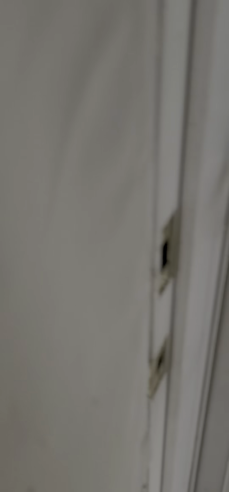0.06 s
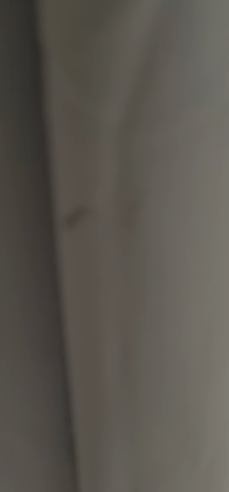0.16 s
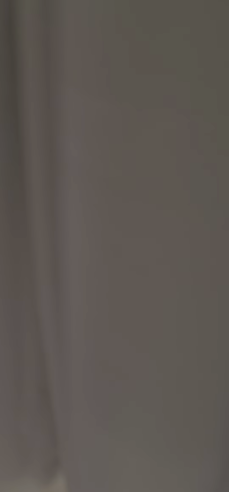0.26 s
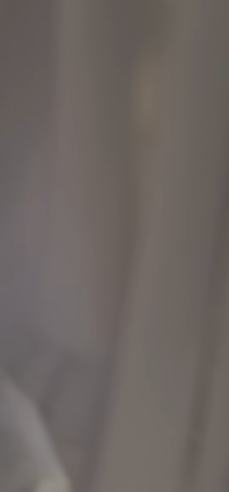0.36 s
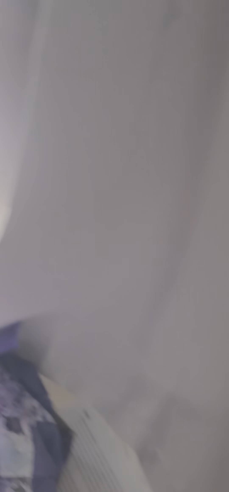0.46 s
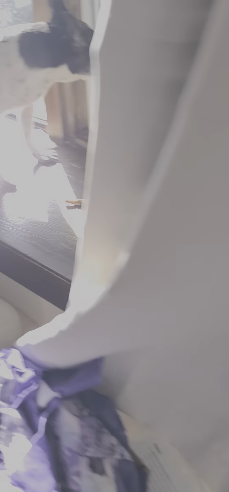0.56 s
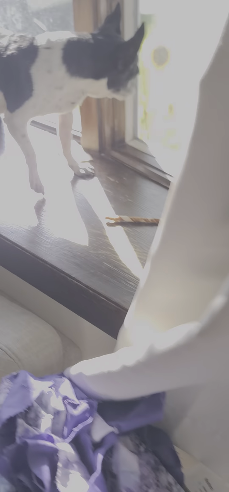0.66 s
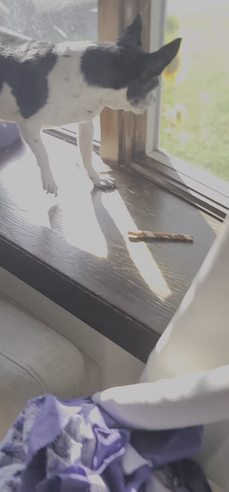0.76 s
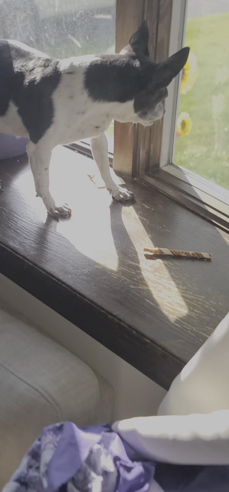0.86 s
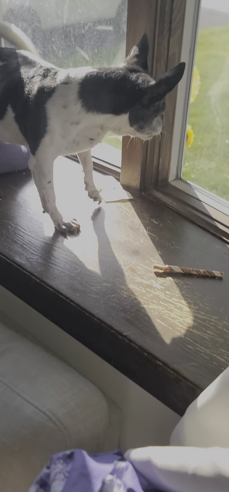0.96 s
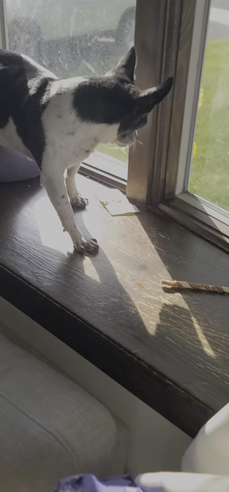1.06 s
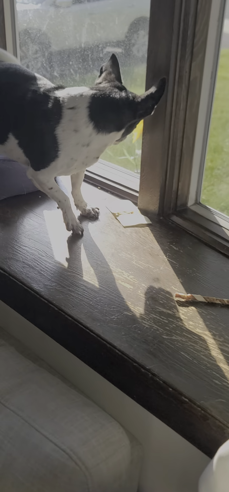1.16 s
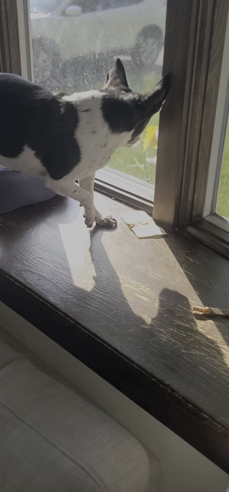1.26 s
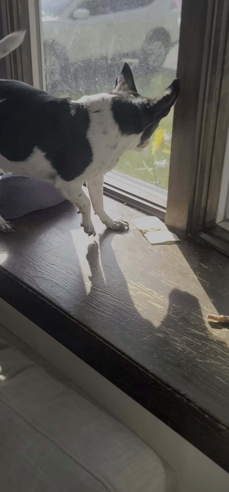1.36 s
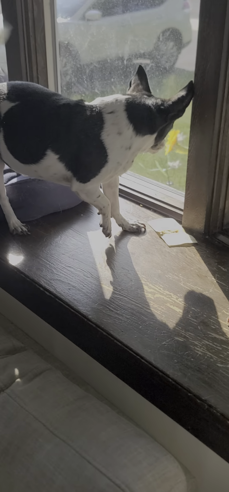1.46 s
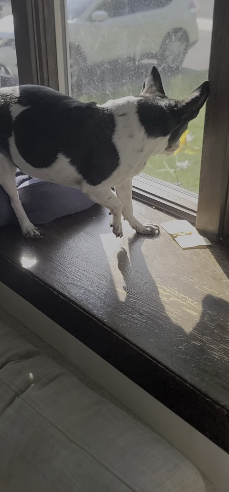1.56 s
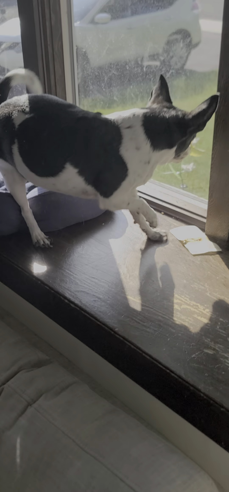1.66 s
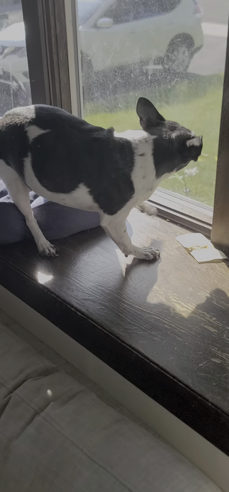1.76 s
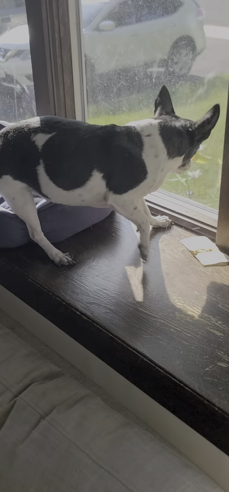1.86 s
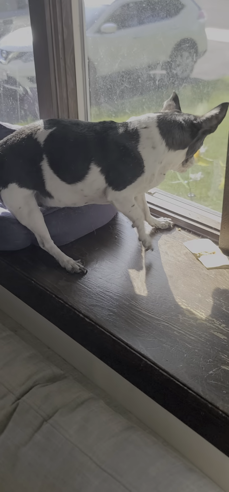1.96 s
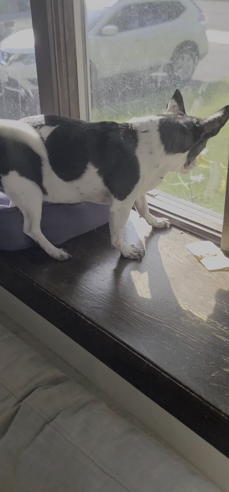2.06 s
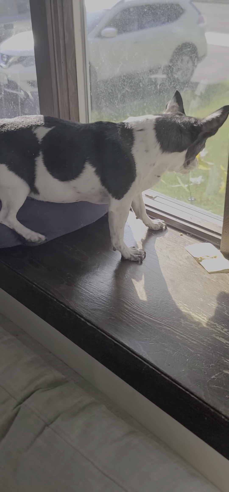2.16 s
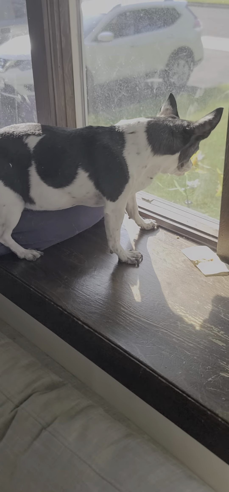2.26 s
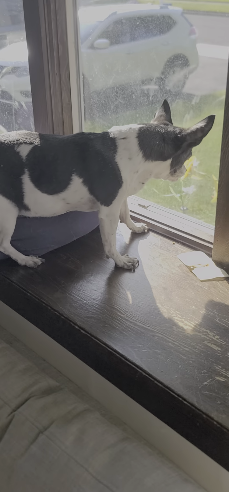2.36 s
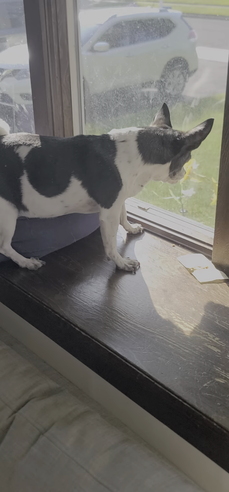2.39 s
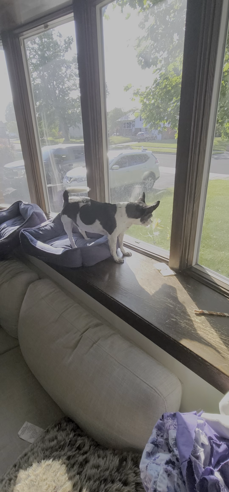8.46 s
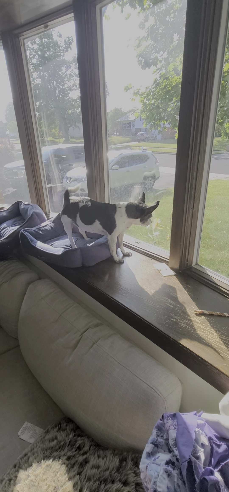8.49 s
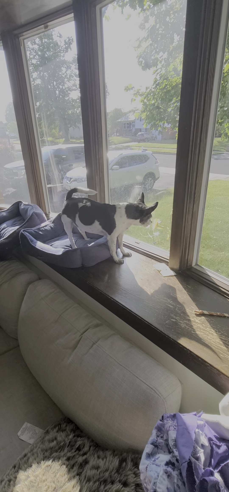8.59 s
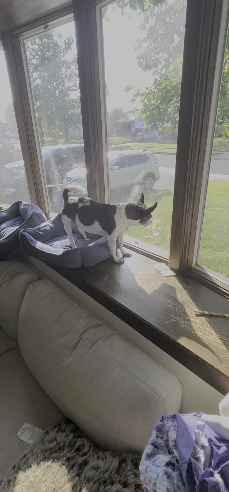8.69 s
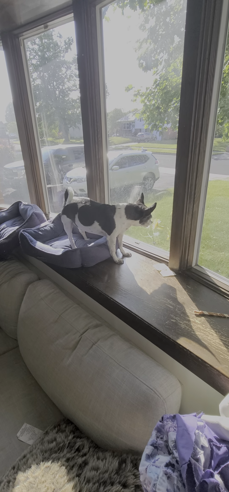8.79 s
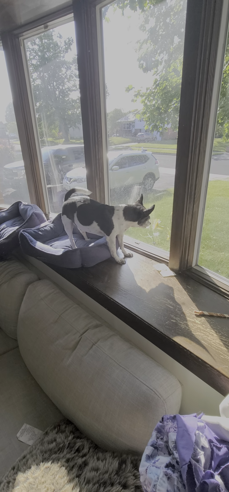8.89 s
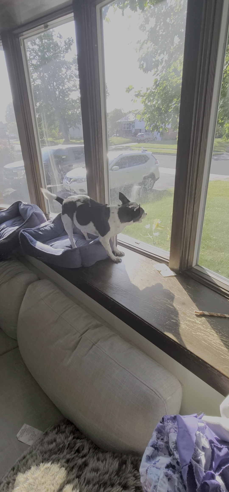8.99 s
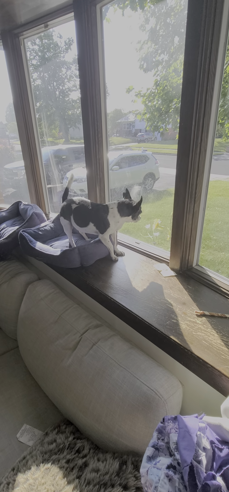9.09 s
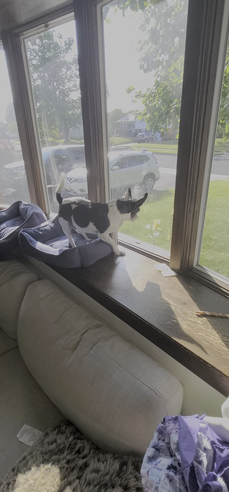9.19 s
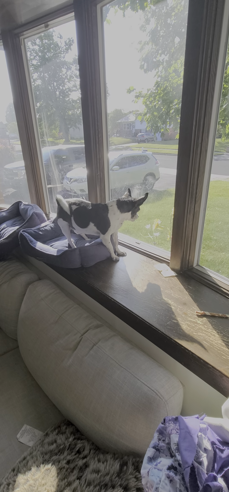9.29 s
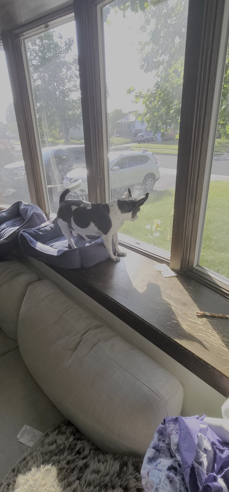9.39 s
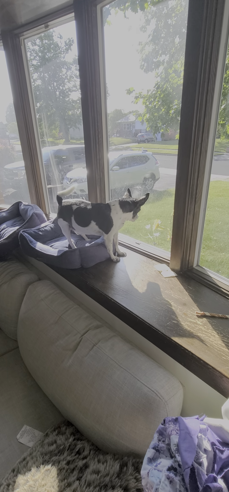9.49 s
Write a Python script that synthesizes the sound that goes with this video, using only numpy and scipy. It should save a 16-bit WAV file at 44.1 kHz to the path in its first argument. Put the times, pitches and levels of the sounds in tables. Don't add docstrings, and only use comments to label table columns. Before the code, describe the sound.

A small dog by a living-room window growls in fluttering low rasps and snaps eight sharp single barks, with claw ticks and dull seat knocks between.

```python
import sys
import numpy as np
from scipy import signal
from scipy.fft import rfft, irfft, next_fast_len
from scipy.io import wavfile
from scipy.ndimage import uniform_filter1d

SR = 44100
rng = np.random.default_rng(int(sys.argv[2]) if len(sys.argv) > 2 else 0)


def magnitude_from_level(level_db):
    exponent = np.asarray(level_db, float) / 20
    return 10 ** exponent


def master(y):
    cut = np.clip(np.atleast_2d(y).T, -1, 1)
    pcm = np.round(cut * 32767)
    wavfile.write(sys.argv[1], SR, pcm.astype(np.int16))


N = 420713

# (frequency [Hz], density [dB per Hz])
RUMBLE_LEVEL = [(0.0, -49.5), (4.75, -56.5), (5.21, -43), (5.5, -54), (8.5, -54), (9.54, -59.5)]
RUMBLE_SPECTRUM = [(12, -59.5), (20, -37), (64, 3.5), (90, -6.5), (151, -10.5), (167, -22.5), (244, -17),
                   (536, -27.5), (769, -25), (1200, -28.5), (1560, -68.5), (2640, -120)]
# (frequency [Hz], density [dB per Hz])
RUSTLE_LEVEL = [(0.0, -68.5), (0.14, -78), (0.58, -61.5), (1.7, -75.5), (1.83, -65.5), (2.1, -68),
                (2.2, -70.5), (3.0, -77), (3.43, -83), (3.8, -66), (4.08, -70.5), (4.14, -59.5),
                (4.24, -71), (4.81, -71.5), (5.26, -67), (5.47, -75), (8.1, -74.5), (8.4, -78.5),
                (9.33, -73.5), (9.54, -80.5)]
RUSTLE_SPECTRUM = [(530, -45), (900, -16.5), (956, -13), (1200, -4), (2500, -8), (5410, -17), (6250, -8),
                   (7230, -19.5), (12600, -20.5), (16000, -37)]
# (time [s], peak [dB], pitch [Hz])
THUDS = [
    (4.418, -41.5, 60),
    (4.755, -30.5, 65.4),
    (5.068, -27, 61.8),
    (8.223, -31, 59.5),
]
# (time [s], peak [dB], ring [Hz], treble [dB])
TICKS = [(0.029, -37, 3430, -23), (0.0365, -27, 3800, -18), (0.05, -43, 5900, -27.5), (.262, -54, 6500, -3),
         (.879, -50, 3970, -20.5), (0.994, -43.5, 2640, -12.5), (1.273, -42.5, 2940, -22),
         (3.948, -44, 1900, -18.5), (4.263, -47.5, 6270, -9), (4.493, -40, 2270, -9.5),
         (4.749, -49, 2300, -13), (1.09, -34, 3400, -12.5), (5.052, -45.5, 2100, -15),
         (5.457, -49.5, 1920, -9), (5.948, -47, 3180, -8), (0.3224, -24, 3040, -12),
         (0.4005, -36.5, 3320, -28), (0.807, -44, 2460, -37), (1.016, -38.5, 3200, -4.5),
         (1.0315, -18.5, 3460, 1.5), (1.05, -31.5, 6400, -4), (1.07, -39, 2600, -13),
         (1.115, -38.5, 6350, -11.5), (1.171, -35, 3340, -15.5), (1.1458, -29, 2450, -10),
         (1.1896, -35.5, 2000, -17), (1.4207, -42, 3000, -0.5), (1.705, -20, 2885, -27.5),
         (1.8258, -26, 6500, -13.5), (1.887, -32, 2470, -5.5), (1.9999, -29, 3100, -14),
         (2.0691, -45, 3200, -8), (2.2238, -29.5, 3220, -15.5), (3.9711, -42.5, 1970, 0),
         (4.1195, -47, 2850, -9.5), (2.418, -42.5, 2050, -32), (2.548, -36, 2870, -16.5),
         (4.4722, -29.5, 2210, -9.5), (4.9061, -25, 2740, -24.5), (5.0767, -33.5, 2250, -9.5),
         (5.3777, -32.5, 2040, -7), (5.7964, -32.5, 5890, -9.5), (6.0702, -37.5, 2280, -21),
         (6.6421, -43, 2780, -12.5), (6.9967, -40, 2330, -9), (7.975, -45, 2200, -9.5),
         (8.4996, -44, 2340, -23), (9.2892, -37.5, 2230, -19.5)]
# (frequency [Hz], density [dB per Hz])
TICK_SPECTRUM = [(650, -46), (1150, -22), (1650, -9), (2950, -8), (3600, -9), (4560, -12), (5710, -12),
                 (7500, -17), (9750, -21), (16500, -120)]
# (time [s], peak [dB])
LAST_KNOCKS = [(.735, -24.5), (1.975, -21), (2.883, -28), (4.027, -26), (5.403, -26), (6.691, -30),
               (7.989, -25.5), (9.239, -26.5)]
# (frequency [Hz], level [dB])
ROOM_T60 = [(150, 0.99), (400, 0.4), (800, 0.51), (1500, 0.48), (3000, 0.33), (8000, 0.34)]
ECHO_LEVEL = [(150, -14), (400, -0.5), (800, -8), (1200, -9.5), (1600, -4.5), (3000, -5), (8000, -5.5)]
# (frequency [Hz], width [Hz], level [dB])
WINDOW_PANES = [(368, 12, -15), (757, 9, -10), (808, 5.5, -9), (1150, 9, -7), (1245, 6, -8), (1490, 9, -12)]
# (frequency [Hz], left over right [dB])
LEFT_LEAD = [(170, .1), (260, .5), (430, .5), (600, -.1), (775, .1), (950, 1.8), (1120, 4.7), (1640, 4.1),
             (2150, 6.2), (2600, 6.6), (3600, 5), (5000, 3.9), (7900, 4.8), (11400, 3.3), (16000, 4)]
LEFT_TILT = [(60, -1.2), (400, 0), (760, -4.2), (1000, -.5), (1400, -1.5), (1700, 3.5), (2300, 3.5),
             (3400, -2.5), (5000, 3), (15000, 4)]

# (start [s], end [s], frequency [Hz], width [Hz], level [dB])
NOSE = [(1.33, 1.66, 5850, 260, -62), (1.4, 1.66, 6700, 300, -68), (3.3, 3.7, 7600, 500, -69),
        (3.42, 3.7, 8900, 1200, -68), (4.48, 5.14, 8350, 600, -62), (4.52, 5.14, 9150, 500, -63),
        (4.5, 5.1, 14500, 3000, -72), (7.3, 7.68, 8000, 900, -73), (7.4, 7.68, 12700, 500, -76),
        (7.5, 7.68, 9500, 600, -75), (8.6, 8.92, 8300, 1100, -70)]
# (time [s], effort [dB], fundamental against it [dB], pitch [Hz], throat [Hz])
DRONE = [(1.14, -49, 2, 233.7, 510), (1.169, -35.5, 3, 245, 487), (1.251, -38, -7, 251.8, 557),
         (1.299, -39.5, -1.5, 252.4, 689), (1.361, -47, 12, 249.6, 667), (1.42, -40.5, -4, 201.8, 506),
         (1.519, -41, -5.5, 185.1, 445), (1.617, -46.5, -7, 195.6, 519.5), (1.681, -29, 4, 252.6, 576)]
# (time [s], peak [dB], fundamental against it [dB])
FLAPS = [(0.229, -35, -9.5), (0.245, -26, -1), (0.281, -24.5, -1), (0.324, -19.5, -9.5),
         (0.356, -26, -10), (0.396, -30.5, 1), (2.46, -25.5, -1), (2.493, -25.5, -14),
         (2.531, -23, -4), (3.304, -34.5, -3), (3.319, -30.5, -0.5), (3.362, -28.5, -12.5),
         (3.397, -27.5, -2), (3.441, -22.5, -5.5), (3.477, -19.5, -7.5), (3.518, -27, -4),
         (3.56, -14.5, -8.5), (3.6, -16, -10), (3.64, -31, -1), (4.354, -27, 0), (4.376, -20, 0.5),
         (4.414, -17.5, -5.5), (4.458, -20.5, -6.5), (4.497, -20, -1.5), (4.529, -17, -21),
         (4.58, -31, -5), (4.623, -24, -0.5), (4.656, -29.5, -21), (4.703, -18.5, -8.5),
         (4.75, -22.5, -14.5), (4.802, -26, -17), (4.836, -19.5, -11.5), (4.887, -24, -13),
         (4.924, -20.5, -5.5), (4.968, -27, 3), (5.02, -22, 0.5), (5.057, -15.5, -18.5),
         (5.083, -19.5, -16), (5.107, -18, 0),
         (5.897, -35, 1), (5.928, -28, -7), (5.972, -31, 7), (6.015, -28, -1.5), (6.061, -23.5, -17),
              (6.088, -37.5, 9), (6.137, -20.5, -2.5), (6.184, -21.5, -6), (6.223, -22, -6),
              (6.273, -22.5, -18), (6.307, -18, -6), (7.14, -38.5, -2.5), (7.158, -29.5, -0.5),
              (7.189, -28.5, -0.5), (7.236, -23, -6), (7.278, -28, -7.5), (7.322, -25, -4),
              (7.357, -27.5, 0.5), (7.407, -31.5, -23), (7.449, -34.5, -3.5), (7.489, -18, -11),
              (7.536, -19.5, -12), (7.576, -17.5, -6.5), (7.619, -18, -5.5), (8.449, -39.5, 4.5),
              (8.493, -23, -6.5), (8.537, -24, -15), (8.57, -22, -17), (8.62, -25.5, 3), (8.662, -24, -11),
              (8.711, -27.5, -25), (8.754, -28.5, -1.5), (8.792, -25.5, -4), (8.823, -16.5, -10.5),
              (8.878, -20, -14)]
# (time [s], effort between flutters [dB], pitch [Hz], throat resonance [Hz])
GROWLS = [
    [(0.21, -66, 230.9, 439), (0.288, -64, 233.2, 396.6), (0.36, -41, 205, 430), (0.44, -9, 204.3, 567)],
    [(2.44, -71.5, 210.4, 645), (2.482, -78, 223.8, 599), (2.57, -59, 268.6, 620)],
    [(3.3, -58, 202, 680), (3.36, -57, 208.9, 694), (3.41, -48, 210.4, 648), (3.582, -37, 227.3, 643),
     (3.69, -28, 245, 690)],
    [(4.33, -52, 231.5, 617), (4.43, -38.5, 240.3, 700), (4.55, -35, 245.6, 665), (5.12, -31, 251.5, 651)],
    [(5.87, -48.5, 207.6, 607), (6.0, -39, 212.1, 678), (6.2, -40, 220.4, 574), (6.34, -32.5, 221.5, 626)],
    [(7.13, -57.5, 219.4, 620), (7.23, -53, 212.5, 648), (7.442, -37, 209.2, 608), (7.68, -41, 247.3, 620)],
    [(8.43, -68, 215, 610), (8.49, -63.5, 211.8, 640), (8.718, -44, 204, 594), (8.92, -34.5, 261.6, 660)],
]
# (share of throat frequency [ratio], width [Hz], level [dB])
GROWL_THROAT = [(0.8, 120, 2), (1.048, 130, 6)]
# (from [Hz], to [Hz], width [Hz], level [dB], closing time [s])
LIPS = (1250, 1000, 330, -6, 0.16)
OPEN_LIPS = [-16, -22, -10, -4, -8, -4, -9.5]
NASAL_RING = [-46, -44, -47, -49, -48, -39, -41]

# (loud from [s], swell [s], voice holds [s], top pitch [Hz], pitch climb [s])
BARKS = [
    (0.463, .045, 0.076, 384.8, .022),
    (1.714, .045, 0.053, 391, .02),
    (2.596, .05, 0.061, 387.8, .016),
    (3.698, 0.024, 0.075, 390.2, .02),
    (5.136, .035, 0.089, 395, .04),
    (6.362, .029, .082, 380.2, .018),
    (7.685, .03, 0.075, 400.1, .042),
    (8.94, .055, .09, 385.1, .022),
]
# (jaw ring [dB], bite [dB], tongue [dB], broken ending [dB], lingering fundamental [dB])
JAWS = [(-4, 2, 3, -3, -31), (0, 4, -5, -7.5, -17), (5, 5.5, -4.5, -6.5, -13),
        (8, -3.5, -8.5, -11.5, -13.5), (4, 3.5, -6, -6, -23), (5, -8, -7.5, -10, -19.5),
        (6.5, 1, -2, -6.5, -20.5), (6, 4, -7, -13.5, -13)]
# (level [dB], top above 8 kHz [dB], effort [dB], fundamental [dB])
TEETH = [(-1.5, -8, -0.34, 1), (0.5, -1.5, 0.05, 5.5), (1.5, 2, -1.2, 0), (1.5, 3.5, -1, -1.5),
         (-1.5, 2.5, -0.9, -1.5), (-1.5, 3.5, 0.84, -1), (-2, 1.5, 0.64, -4), (-0.5, 2.5, -0.64, -1)]
# (resonance [Hz], climb [Hz/s], catch delay [s], catch [dB], throat shrinks to [ratio])
TONGUES = [(2290, 5000, 0.02, 4, 0.8), (2600, 15000, 0.0068, 2, .85), (2400, 13000, .015, -1.5, .92),
           (2450, 8900, .015, 0, .92), (2300, 9400, 0.013, 5, 0.87), (2480, 11000, 0.012, -6, .9),
           (2450, 13000, 0.014, 0.5, 0.77), (2450, 14000, 0.021, -8, 0.61)]
# (frequency [Hz], width [Hz], level [dB])
BARK_THROAT = [(330, 700, -13.5), (774.6, 280, -1)]
BARK_MOUTH = [(665, 550, -18.5), (2040, 300, -24), (2310, 110, -28.5)]
# (frequency [Hz], width [Hz])
JAW_RING = (1167, 600)
# (frequency [Hz], width [Hz], level [dB])
BITE = (1520, 310, -20.5)
# (up to [Hz], width [Hz], level [dB])
TONGUE_SWEEP = (3500, 200, -26)
# (frequency [Hz], density [dB per Hz])
BREATH = [(1760, -44), (2900, -25.5), (3650, -43.5), (4250, -25), (4850, -18.5), (5700, -4.5), (6500, -8.5),
          (9600, -13.5), (11400, -24), (14000, -17), (16000, -29)]
# (from [Hz], to [Hz], width [Hz], level [dB])
WHISTLE = (4201, 4498.5, 300.5, -17.5)


def read(points, hz):
    f, value = np.transpose(points)
    return np.interp(np.log(hz + 1), np.log(f + 1), value)


def evened(x):
    return x / np.sqrt(np.mean(x ** 2) + 1e-20)


def add(mix, s, sound):
    part = mix[..., round(s * SR):][..., :sound.shape[-1]]
    part += sound[..., :part.shape[-1]]


def resonate(x, hz, width):
    turn = np.exp(2j * np.pi * np.cumsum(hz * np.ones(x.shape[-1])) / SR)
    r = np.exp(-np.pi * width / SR)
    return 2 * (turn * signal.lfilter([(1 - r) ** 2], [1, -2 * r, r * r], x / turn)).real


def coloured(x, points):
    size = next_fast_len(x.shape[-1])
    gain = magnitude_from_level(read(points, np.fft.rfftfreq(size, 1 / SR)))
    return evened(irfft(rfft(x, size) * gain, size)[..., :x.shape[-1]])


def wobble(n, ms):
    span = max(int(ms * SR / 1000), 2)
    return evened(uniform_filter1d(uniform_filter1d(rng.standard_normal(n), span), span))


def patchy(x, patch_db, bins=5, frames=6):
    z = signal.stft(x, nperseg=256)[2]
    patches = uniform_filter1d(rng.standard_normal(z.shape[-2:]), size=bins, axis=0)
    patches = uniform_filter1d(patches, size=frames, axis=1)
    z = z * magnitude_from_level(patch_db * evened(patches))
    return evened(signal.istft(z, nperseg=256)[1][..., :x.shape[-1]])


def background():
    t = np.arange(N) / SR
    a, b = rng.standard_normal((2, 3, N))
    rumble = coloured(a[0] + .18 * a[1:], RUMBLE_SPECTRUM)
    rumble *= magnitude_from_level(np.interp(t, *np.transpose(RUMBLE_LEVEL)) - 3.0 + 0.75 * wobble(N, 40))
    rustle = patchy(coloured(b[0] + b[1:], RUSTLE_SPECTRUM), patch_db=3.5, bins=9, frames=30)
    rustle *= magnitude_from_level(np.interp(t, *np.transpose(RUSTLE_LEVEL)) + 4.5 + 1.5 * wobble(N, 12))
    return rumble + rustle


def room(x):
    taps = np.zeros((3, SR))
    at = np.arange(300, SR - 20, 20) + rng.integers(0, 20, (3, (SR - 301) // 20))
    np.put_along_axis(taps, at, rng.choice([-1., 1.], at.shape), 1)
    hz, t, z = signal.stft(taps[0] + 1.8 * taps[1:], SR, nperseg=256)
    t60 = read(ROOM_T60, hz)[:, None]
    z = z * magnitude_from_level(read(ECHO_LEVEL, hz)[:, None] - 60 * t / t60)
    z /= np.sqrt(t60 * SR / 100)
    echoes = signal.istft(z, SR, nperseg=256)[1]
    return signal.fftconvolve(x[None], echoes, axes=1)[:, :N]


def window_bay(x):
    return sum(magnitude_from_level(db) * resonate(x, hz, width) for hz, width, db in WINDOW_PANES)


def thuds():
    out, t = np.zeros(N), np.arange(14000) / SR
    swell = (1 - np.exp(-(t / .045) ** 2)) * np.exp(-t / .05)
    for s, db, hz in THUDS:
        add(out, s - .01, magnitude_from_level(db + 9.0) * np.sin(2 * np.pi * hz * t) * swell)
    return out


def ticks():
    out, t = np.zeros((2, N)), np.arange(12000) / SR
    scratch_t60 = 0.43
    for s, db, hz, treble_db in TICKS:
        a, b = rng.standard_normal((2, 3, len(t)))
        noise = patchy(coloured(a[0] + 2.0 * a[1:], TICK_SPECTRUM), patch_db=5.0)
        treble = evened(resonate(resonate(b[0] + 1.8 * b[1:], 11000, 12000), 11000, 12000))
        noise += magnitude_from_level(treble_db) * treble * (0.52 + 0.6 * np.exp(-t / 0.026))
        noise += 0.31 * evened(resonate(b[0], 500, 700))
        soft = np.maximum(.0022 * magnitude_from_level(-.35 * (db + 25)), .003)
        crack = noise * (np.exp(-t / (3.0 * soft)) + 0.15 * magnitude_from_level(-60 * t / scratch_t60))
        ring = .6 * np.sin(2 * np.pi * hz * t) * np.exp(-t / .004)
        side_gain = magnitude_from_level(db - 5.0 + np.array([[-.6], [.6]]))
        add(out, s - soft, side_gain * (crack + ring) * (1 - np.exp(-(t / soft) ** 2)))
    return out


def knocks():
    out, t = np.zeros(N), np.arange(4000) / SR
    shape = (1 - np.exp(-t / 0.00071)) * np.exp(-t / 0.023)
    for (loud, _, holds, *_), (last, last_db) in zip(BARKS, LAST_KNOCKS):
        first = loud + holds + .068
        times = (first, (first + last) / 2, last)
        for s, db, hz in zip(times, (-26.5, -33, last_db), (205, 143, 134)):
            low = evened(resonate(rng.standard_normal(len(t)), hz * rng.uniform(.75, 1.4), 110))
            slap = evened(resonate(rng.standard_normal(len(t)), 750, 900))
            add(out, s - .005, magnitude_from_level(db - 7) * (low + 0.5 * slap) * shape)
    return out


def folds(hz, rough, jitter):
    rough = np.clip(rough, 0, 1)
    turns = np.cumsum(hz * (1 + jitter * rough * wobble(len(hz), 3))) / SR
    pulses = evened(sum(np.cos(2 * np.pi * k * turns) for k in range(1, 9)))
    noise = resonate(rng.standard_normal(len(hz)), 770, 1900)
    puffs = evened((0.6 + np.exp(-(turns % 1) / 0.51)) * noise)
    return (1 - rough) * pulses + rough * puffs, turns


def nose_hiss(start, end, hz, width, db, flaps):
    n = round((end - start) * SR)
    glide = hz * np.linspace(.975, 1.025, n) + 70 * wobble(n, 40)
    air = evened(resonate(rng.standard_normal(n), glide, .7 * width))
    air *= magnitude_from_level(db - 3.5 + 3.5 * wobble(n, 8))
    puffs = flaps[round(start * SR):][:n]
    puffs = puffs / (uniform_filter1d(puffs, size=2600) + 1e-3)
    return air * (0.26 + .5 * puffs) * np.linspace(.6, 1.2, n) * signal.windows.tukey(n, .2)


def drone():
    s, *columns = np.transpose(DRONE)
    t = np.arange(s[0], s[-1], 1 / SR)
    effort_db, low_db, hz, throat_hz = (np.interp(t, s, c) for c in columns)
    rough = np.clip(.36 + .007 * (250 - hz), .35, .75)
    drive, turns = folds(hz, rough, jitter=0.11)
    drive *= 1 + 0.4 * np.cos(np.pi * turns)
    throat = evened(resonate(resonate(drive, throat_hz, 330), throat_hz - 60, 890))
    lips = magnitude_from_level(-1.5 - 150 * abs(t - s[0] - .05)) * evened(resonate(drive, 770, 260))
    lips += magnitude_from_level(-8.5 - 90 * abs(t - s[0] - .07)) * evened(resonate(drive, 1160, 260))
    chest = magnitude_from_level(low_db) * np.sqrt(2) * np.cos(2 * np.pi * turns)
    chest *= magnitude_from_level(-1.5 + 1.8 * wobble(len(t), 12))
    level = magnitude_from_level(effort_db + 5.0 * np.tanh(wobble(len(t), 1.6)))
    return s[0], level * (throat + lips + chest) * signal.windows.tukey(len(t), .05)


def flutter():
    t, gate = np.arange(2200) / SR, np.zeros((2, N))
    flap = (1 - np.exp(-(t / .008) ** 2)) * np.exp(-(t / .016) ** 2)
    for s, db, low_db in FLAPS:
        add(gate, s - .003, magnitude_from_level([[db - 5.5], [db - 5.5 + low_db]]) * flap)
    return gate


def growl(rows, open_db, nasal_db, gate):
    s, *columns = np.transpose(rows)
    t = np.arange(s[0], s[-1], 1 / SR)
    effort_db, hz, throat_hz = (np.interp(t, s, c) for c in columns)
    high, low = gate[:, round(s[0] * SR):][:, :len(t)]
    ride = high / (uniform_filter1d(high, size=2600) + magnitude_from_level(effort_db))
    hz = hz * (1 + 0.038 * (ride - .8))
    throat_hz = throat_hz * (1 + 0.073 * (ride - .8))
    rough = np.clip(.45 - (effort_db + 36) / 35, .4, .85)
    drive, _ = folds(hz, rough, jitter=.2)
    throat = sum(magnitude_from_level(db) * resonate(drive, share * throat_hz, w) for share, w, db in GROWL_THROAT)
    from_hz, to_hz, width, lips_db, closing = LIPS
    gap = np.exp(-(t - t[0]) / closing)
    lips = resonate(resonate(drive, to_hz + (from_hz - to_hz) * gap, width), 1400, 900)
    nasal = evened(resonate(drive, 2450 + 330 * gap ** 2, 200))
    throat = evened(resonate(throat, throat_hz, 900))
    throat += magnitude_from_level(lips_db + open_db) * (.14 + gap) * evened(lips)
    throat += magnitude_from_level(nasal_db) * (1 + 3 * gap ** 3) * nasal
    throat /= np.sqrt(uniform_filter1d(throat ** 2, size=500) + 0.37)
    chest = evened(resonate(drive, hz, 110))
    steady = magnitude_from_level(effort_db - 9 + 3.5 * wobble(len(t), 5))
    voice = throat * (high + steady) + chest * (low + 0.56 * steady)
    return s[0], voice * signal.windows.tukey(len(t), .08)


def bark_throat(drive, opening, closing, low_db):
    throat = 0
    for k, (hz, width, db) in enumerate(BARK_THROAT):
        ring = resonate(drive, hz * (0.79 + 0.2 * opening) * closing ** k, width)
        throat = throat + (-1) ** k * magnitude_from_level(db + low_db * (1.5 - k)) * ring
    return throat / np.sqrt(uniform_filter1d(throat ** 2, size=900) + 1e-9)


def bark_mouth(hoarse, since, swell, bite_db, tongue_db, tongue_hz, tongue_climb):
    rising = 0.831 + rng.uniform(0.12, 0.13) * np.clip((since + swell) / 0.13, 0, 1)
    mouth = sum(magnitude_from_level(db) * evened(resonate(hoarse, hz * rising, w)) for hz, w, db in BARK_MOUTH)
    mouth = mouth * (.12 + 1.25 * np.clip(since / 0.055, 0, 1) ** 2)
    bite_hz, bite_width, bite_level = BITE
    mouth += magnitude_from_level(bite_level + bite_db) * evened(resonate(hoarse, bite_hz, bite_width))
    to_hz, width, sweep_db = TONGUE_SWEEP
    sweep_hz = np.clip(tongue_hz + tongue_climb * since, 2150, to_hz)
    breathy = hoarse + 0.9 * rng.standard_normal(len(since))
    fade = np.clip(2.6 - (since + 0.048) / 0.044, 0, 1)
    return mouth + magnitude_from_level(sweep_db + tongue_db) * evened(resonate(breathy, sweep_hz, width)) * fade


def bark_air(since, turns, top_db):
    both, sides = rng.standard_normal(len(since)), rng.standard_normal((2, len(since)))
    spectrum = [(f, d + top_db * (f > 8000)) for f, d in BREATH]
    air = patchy(coloured(both + 1.1 * sides, spectrum), patch_db=7, bins=2, frames=18)
    from_hz, to_hz, width, db = WHISTLE
    whistle_hz = from_hz + (to_hz - from_hz) * np.clip(since / 0.21, 0, 1)
    air += magnitude_from_level(db) * evened(resonate(both, whistle_hz, width))
    return air * (1 + .4 * np.cos(2 * np.pi * turns))


def bark(timing, jaws, teeth, tongue):
    loud, swell, holds, top_hz, climb = timing
    jaw_db, bite_db, tongue_db, end_db, linger_db = jaws
    air_db, top_db, push_db, low_db = teeth
    tongue_hz, tongue_climb, catch_s, catch_db, shrink = tongue
    t = np.arange(round(.4 * SR)) / SR + loud - .08
    since = t - loud
    voiced = np.clip(since, 0, None)
    breaks, end = loud + holds, .041
    db = -9.5 - 0.3663 * loud + push_db
    after = np.clip((t - breaks) / end, 0, None)
    opening = np.clip(1 + since / swell, 0, 1)

    leap = 22.23 + 794.6 * climb
    hz = top_hz - leap * np.exp(-voiced / climb) - 100 * (1 - opening)
    hz -= 45 * np.minimum(after, 2) + 4 * wobble(len(t), 13)
    knee_db = min(-25 + 420 * swell, -3)
    times = [loud - swell - .03, loud - swell, loud - 0.012, loud,
             breaks, breaks + .012, breaks + end, breaks + 3 * end]
    effort = np.interp(t, times, [-40, -15, knee_db, 0, -3.1, end_db, end_db - 7.0, -48])
    rough = .09 + 4.2 * swell * np.exp(-voiced / .03)
    rough += 0.77 * np.minimum(3 * after, 1) + .5 * (1 - opening) ** .5
    drive, turns = folds(hz, rough, jitter=.1)
    hoarse = folds(hz, rough + .24, jitter=.1)[0]

    closing = 1 - (1 - shrink) * np.minimum(1.9 * after, 1)
    throat = bark_throat(drive, opening, closing, low_db)
    throat *= magnitude_from_level(catch_db * np.exp(-((since - catch_s) / 0.0032) ** 2))
    gape = np.clip((since + 0.85 * swell) / 0.11, 0, 1)
    jaw = evened(resonate(resonate(drive, *JAW_RING), *JAW_RING)) * gape
    jaw *= magnitude_from_level(jaw_db - 83.5 * np.clip(since - 0.0087, 0, .08))
    jaw *= magnitude_from_level(3 * np.minimum(4 * after, 1))
    mouth = bark_mouth(hoarse, since, swell, bite_db, tongue_db, tongue_hz, tongue_climb)
    air = bark_air(since, turns, top_db)
    air *= magnitude_from_level(-20 + air_db + 1.7 * np.minimum(after, 1)) * (0.37 + 0.94 * gape)

    linger = np.clip((t - breaks + .02) / .02, 0, 1) * np.clip((breaks + .05 - t) / .012, 0, 1)
    chest_turns = np.cumsum(hz + 30 * np.minimum(after, 2)) / SR
    chest = magnitude_from_level(db + linger_db) * linger * np.cos(2 * np.pi * chest_turns)
    voice = throat + jaw + mouth * (0.5 + gape) + air
    return t[0], magnitude_from_level(db - 2.0 + effort) * voice + chest


def dog():
    out, gate = np.zeros((2, N)), flutter()
    for row in NOSE:
        add(out, row[0], nose_hiss(*row, gate[0]))
    add(out, *drone())
    for row in zip(GROWLS, OPEN_LIPS, NASAL_RING):
        add(out, *growl(*row, gate))
    for row in zip(BARKS, JAWS, TEETH, TONGUES):
        add(out, *bark(*row))
    return out


def scene():
    seat = dog() + knocks()
    mono = seat.mean(axis=0)
    return background() + thuds() + ticks() + room(mono) + window_bay(mono) + seat


def low_pass(x):
    return signal.sosfilt(signal.butter(12, 16250, fs=SR, output="sos"), x)


def record(dry):
    size = next_fast_len(N)
    hz = np.fft.rfftfreq(size, 1 / SR)
    lead = read(LEFT_LEAD, hz) * np.minimum(hz / 300, 1)
    left = magnitude_from_level(read(LEFT_TILT, hz) / 2) * np.exp(.5j * lead)
    x = irfft(rfft(dry, size) * np.array([left, 1 / left]), size)[:, :N]
    mix = 1.4 * x / (1 + (x / .73) ** 4) ** (1 / 4)
    return low_pass(mix)


dry = scene()
out = record(dry)
master(out)
```